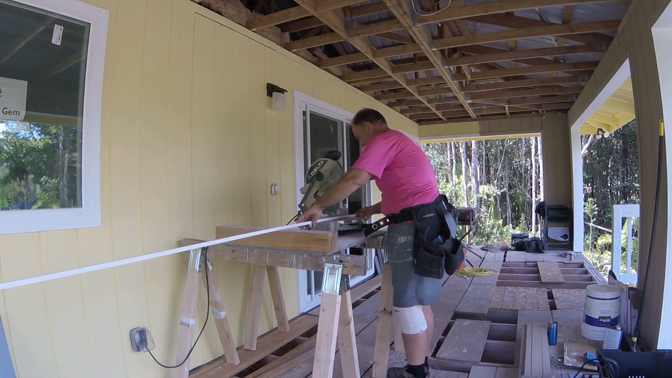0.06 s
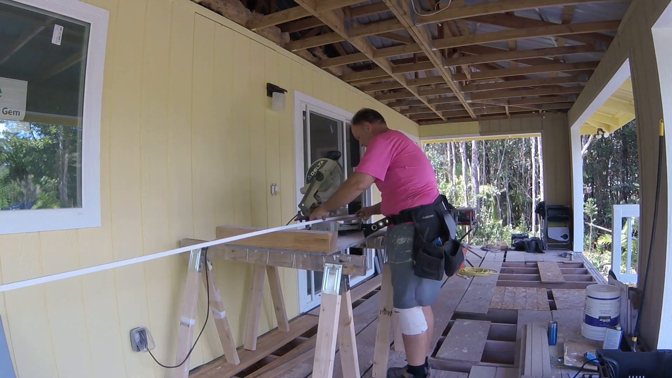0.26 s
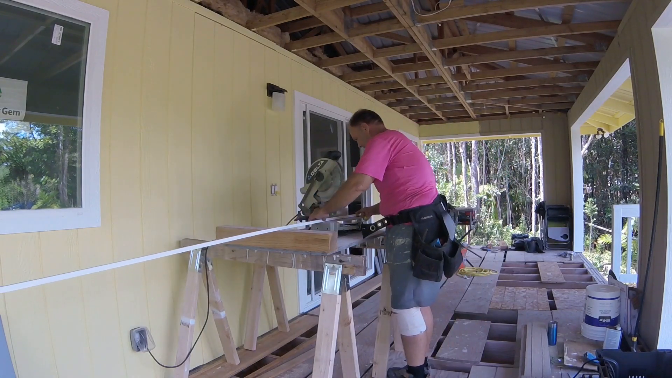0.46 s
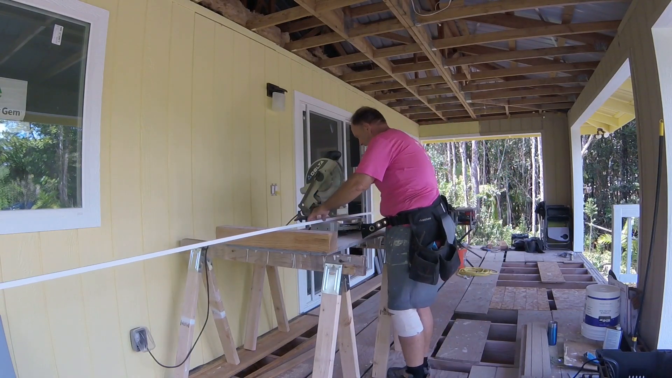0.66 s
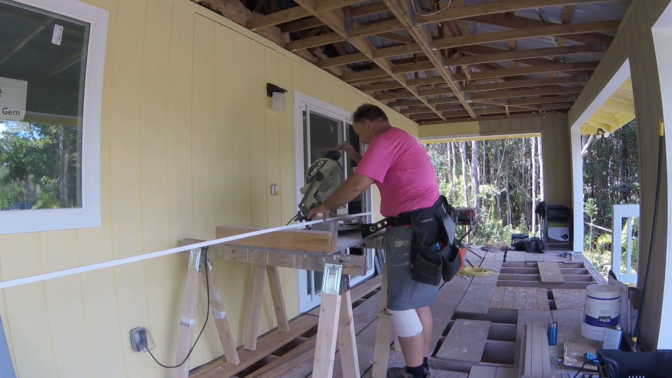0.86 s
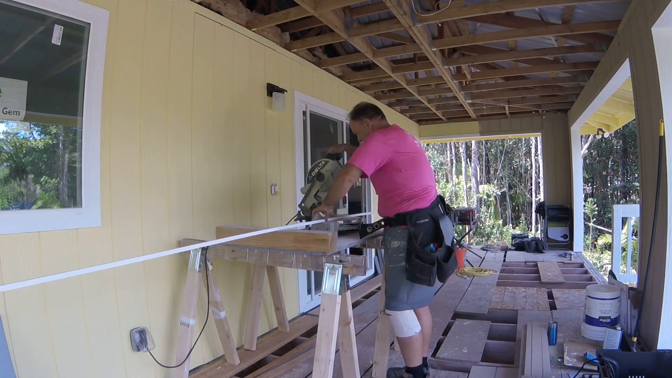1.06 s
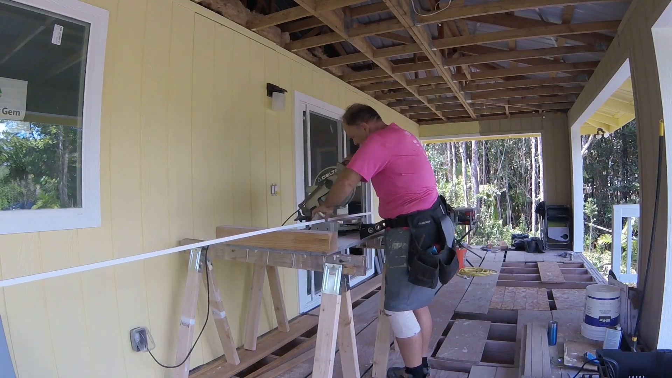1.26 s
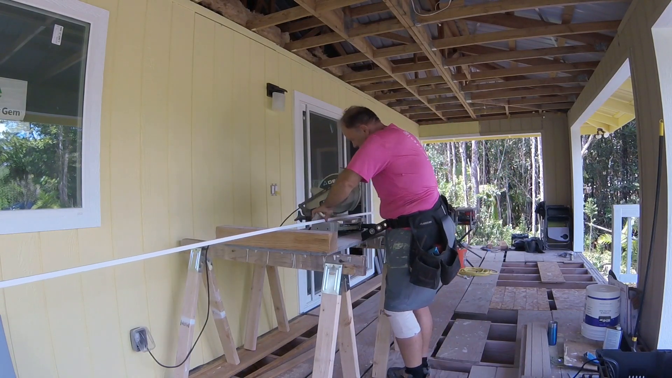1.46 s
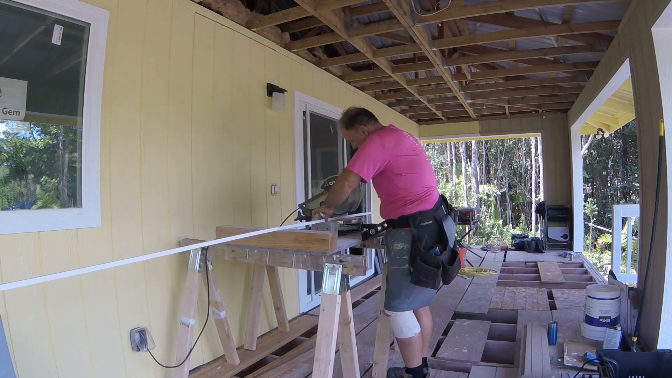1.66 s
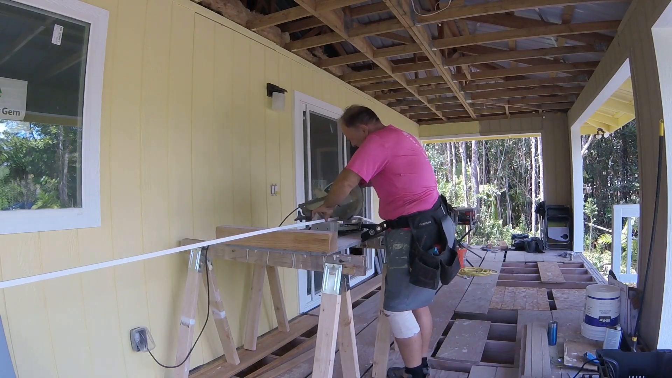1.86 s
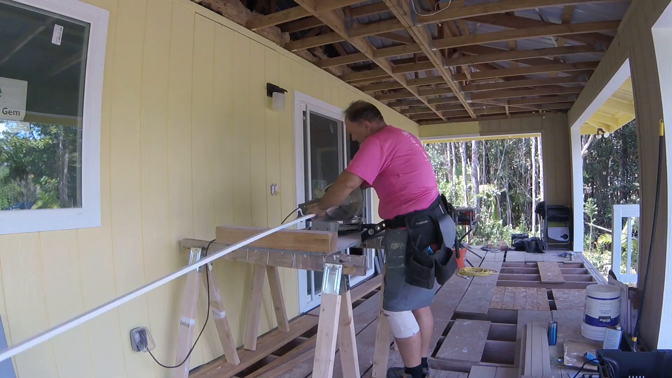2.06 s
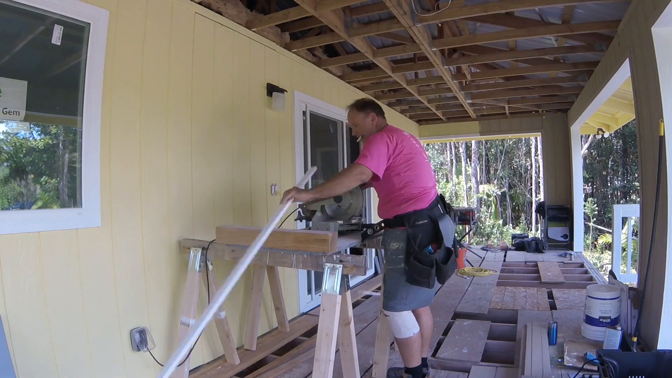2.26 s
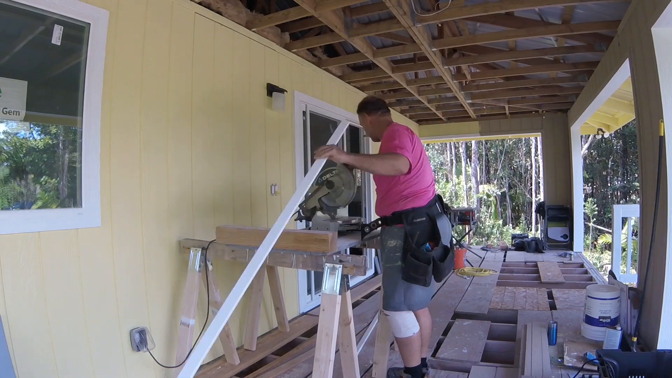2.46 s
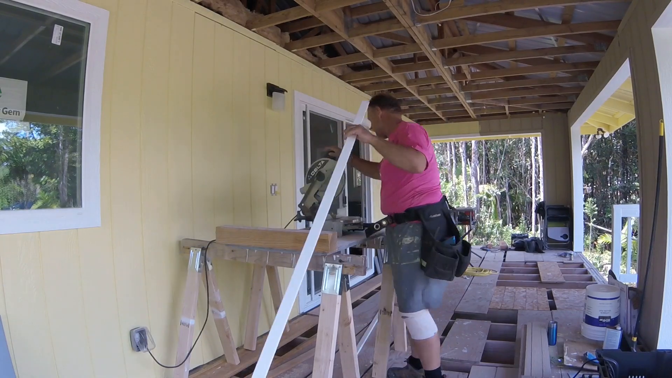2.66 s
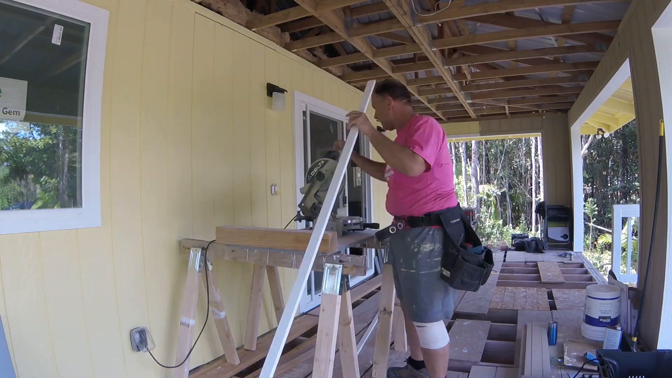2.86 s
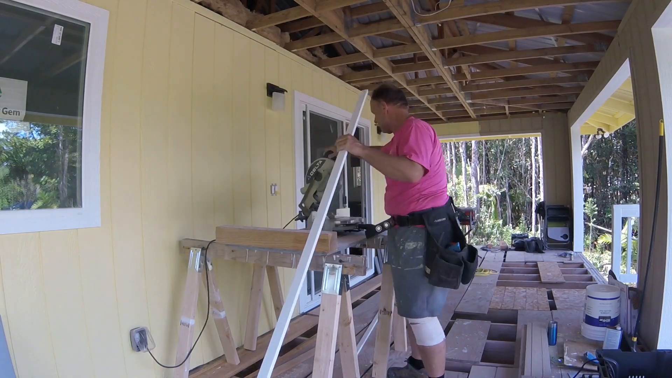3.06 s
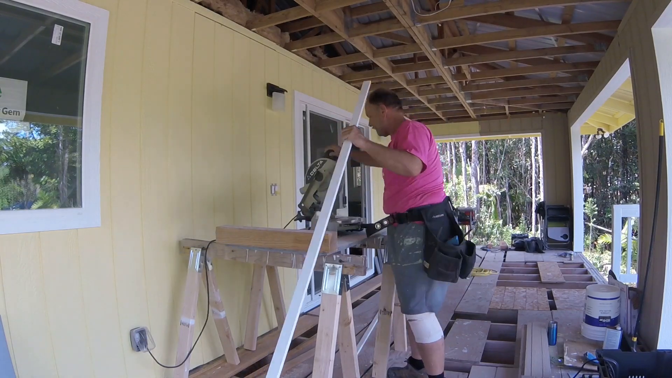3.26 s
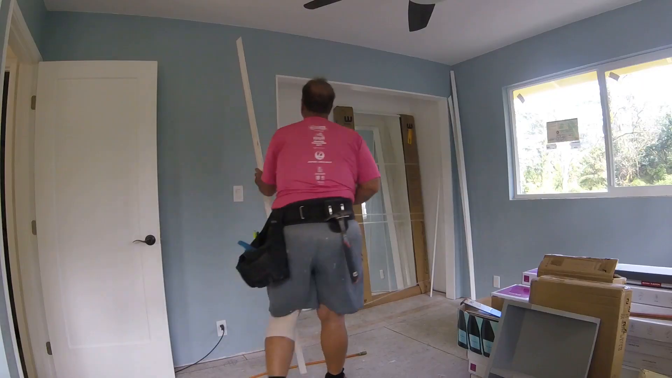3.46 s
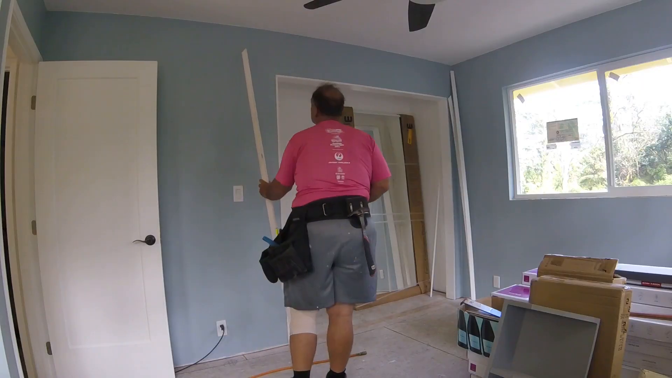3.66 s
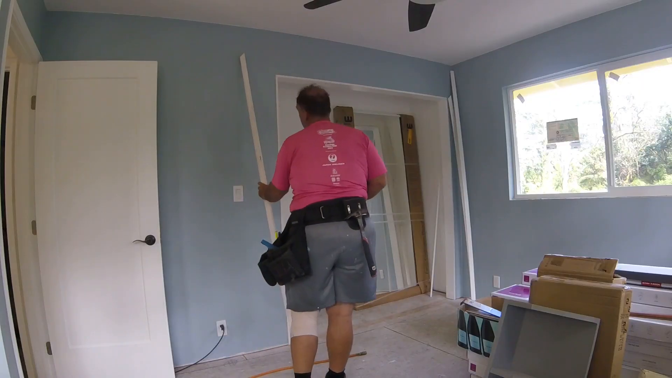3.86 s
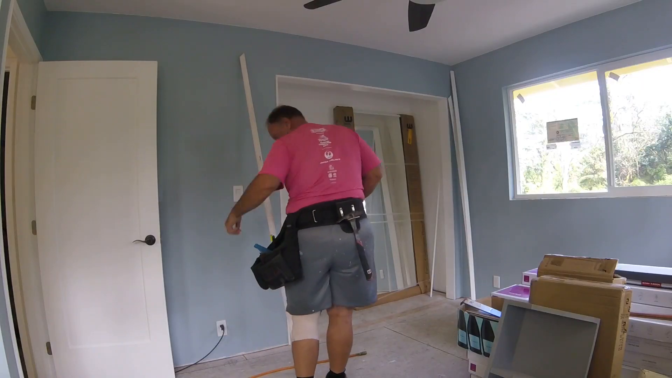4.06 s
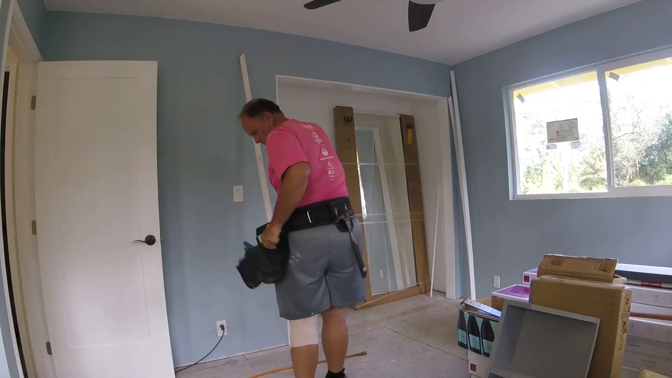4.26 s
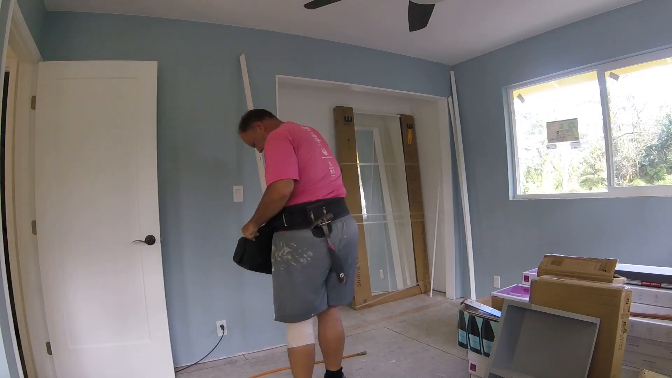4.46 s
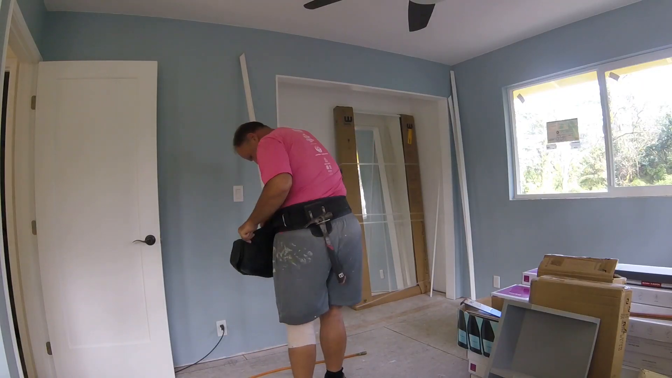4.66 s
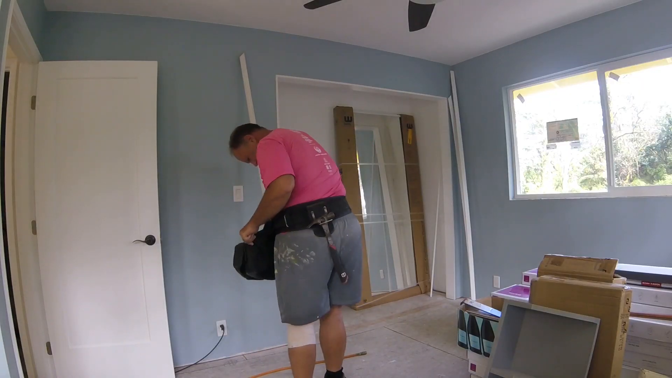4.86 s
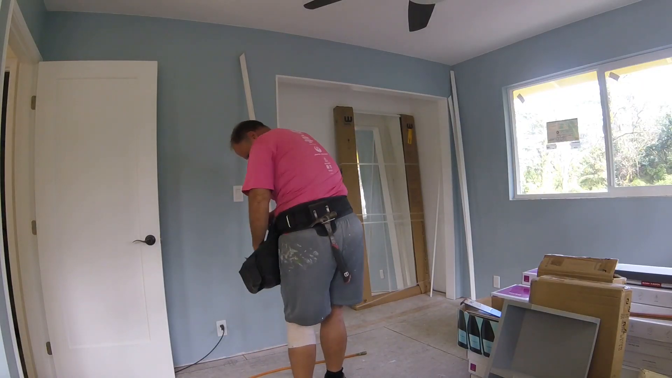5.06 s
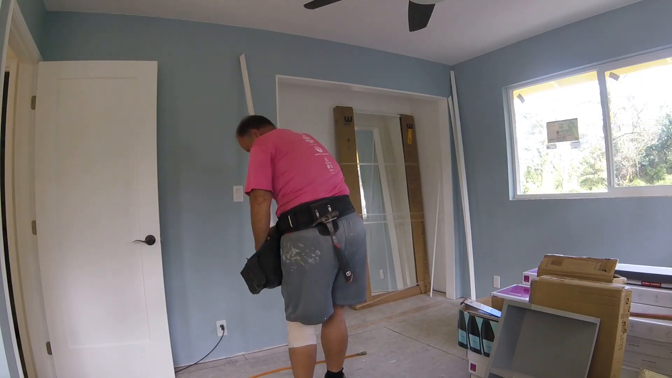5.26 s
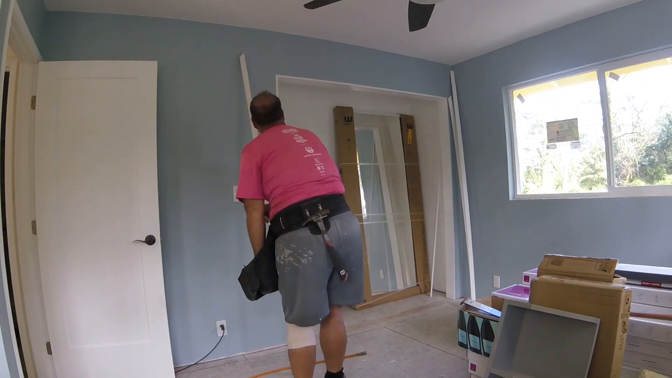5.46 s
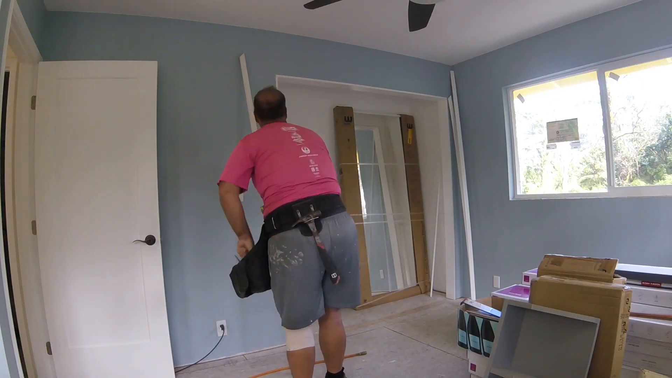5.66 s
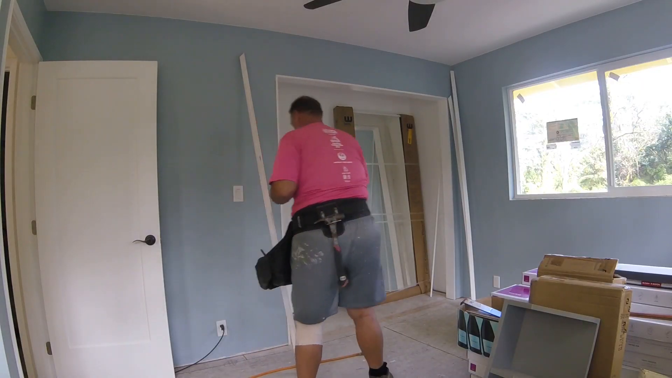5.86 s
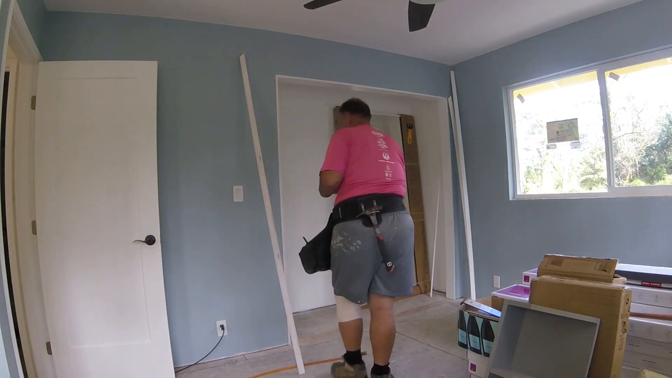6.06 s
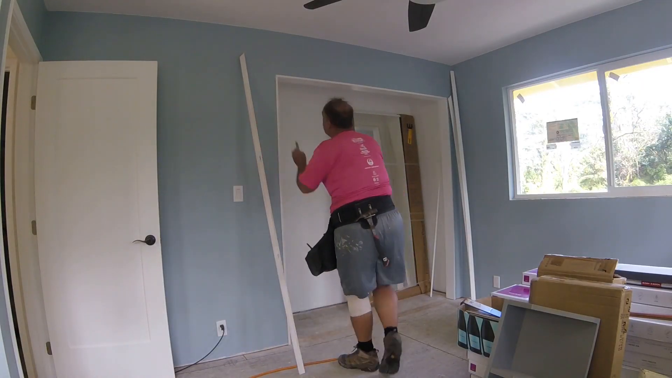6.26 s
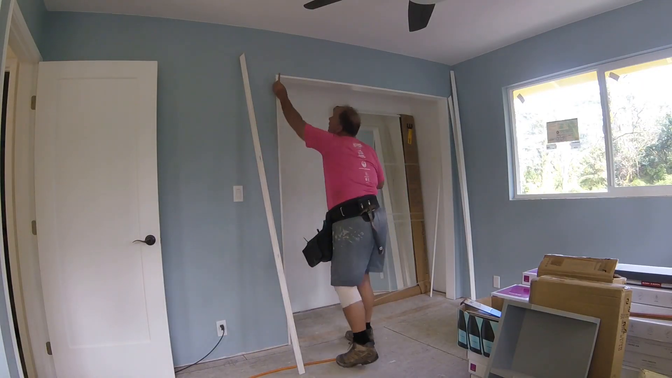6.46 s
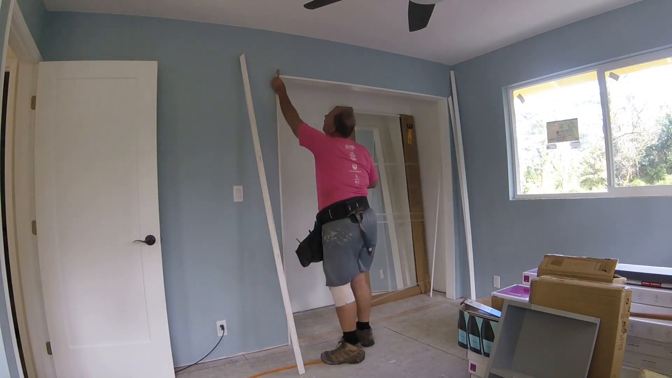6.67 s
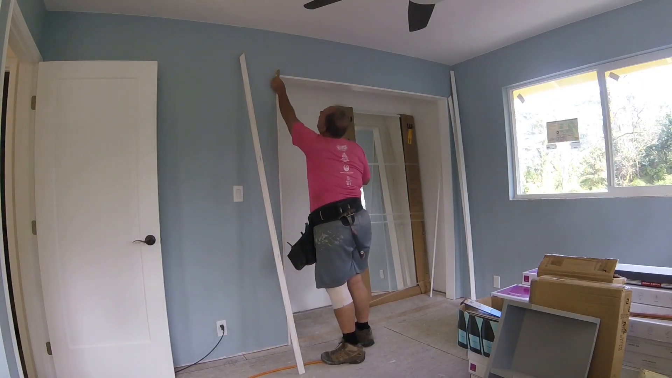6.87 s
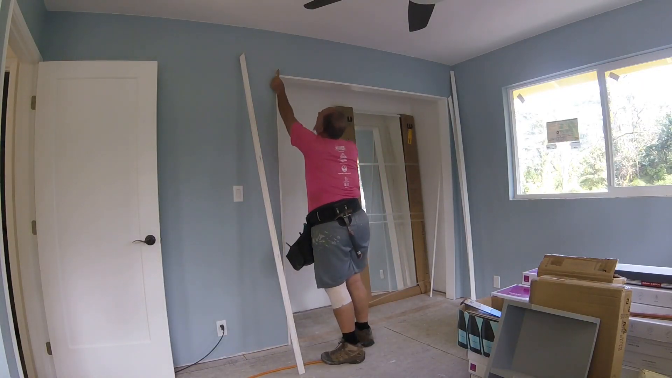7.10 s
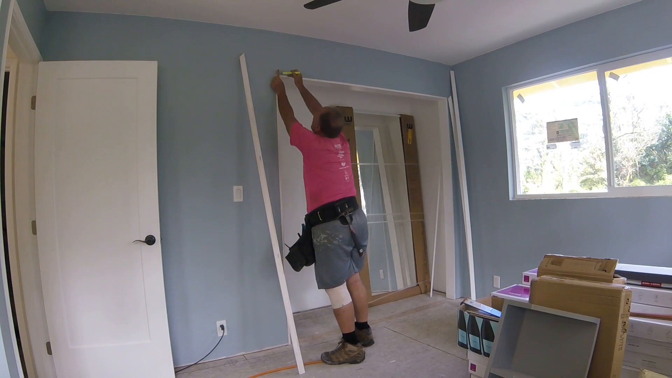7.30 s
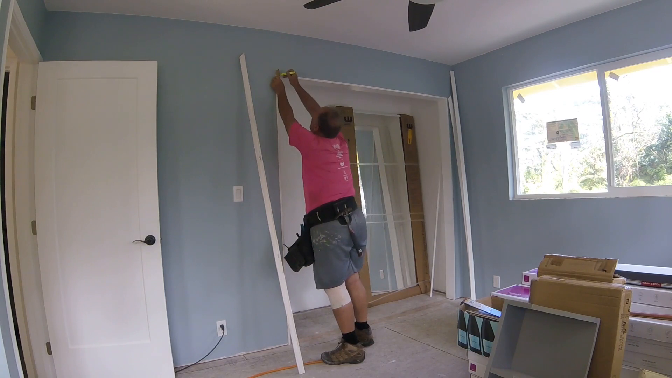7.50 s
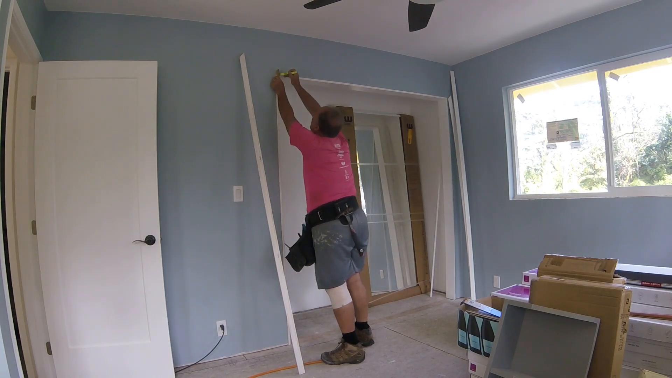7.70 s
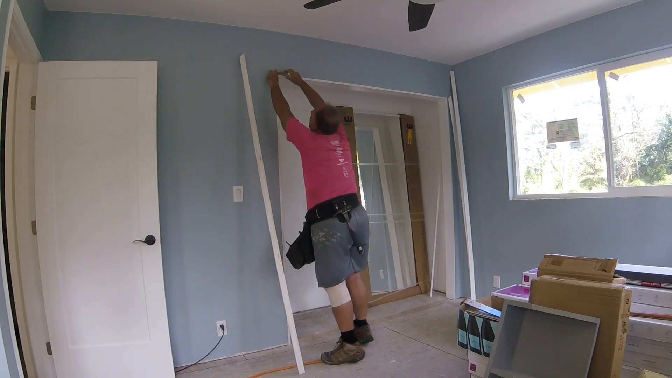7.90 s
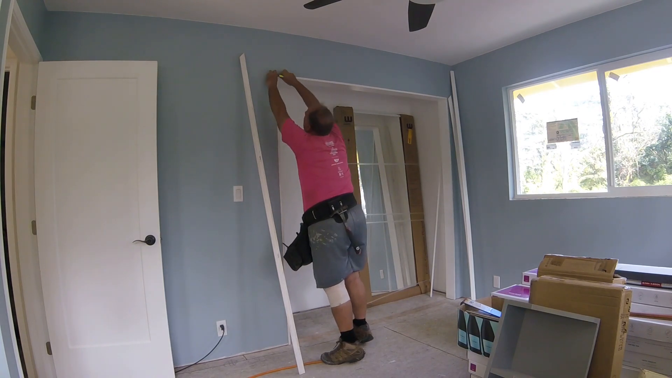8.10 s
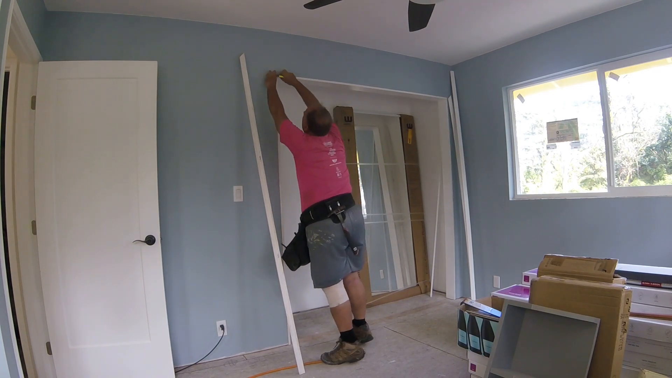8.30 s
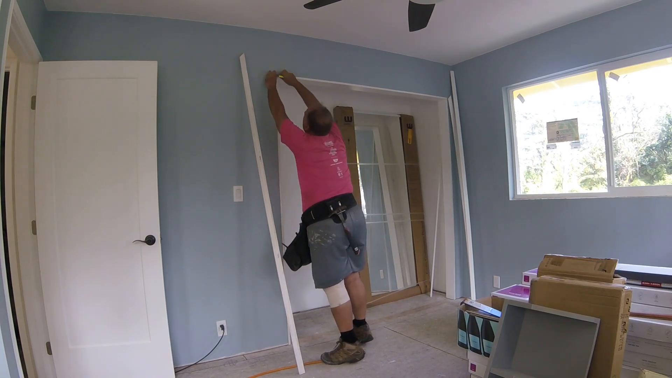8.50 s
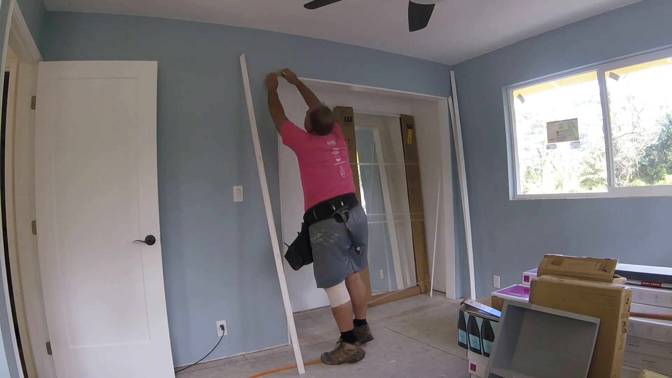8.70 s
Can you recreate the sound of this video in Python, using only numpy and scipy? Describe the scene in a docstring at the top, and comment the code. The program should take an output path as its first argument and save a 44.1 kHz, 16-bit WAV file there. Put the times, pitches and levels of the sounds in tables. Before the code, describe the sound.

A mitre saw cuts wooden trim and winds down with clattering knocks, then quiet indoor knocks, cloth rustles and shuffling footsteps follow.

```python
"""Mitre saw on an open porch: starts, bites through a strip of trim, coasts down; head and strip knock.
Fan roar, commutator whine and gear tones follow armature speed and ring the blade and housing.
The scene then jumps indoors: strip stood against a wall, hand in a tool pouch, shuffling shoes, faint hum.
Knocks are decaying modes; thuds, clacks and cloth are shaped noise."""
import sys
import numpy as np
from scipy import signal
from scipy.fft import rfft, irfft
from scipy.io import wavfile
from scipy.ndimage import uniform_filter1d

SR = 44100
rng = np.random.default_rng(int(sys.argv[2]) if len(sys.argv) > 2 else 0)


def materialize(psi):
    """Save the field psi as 16-bit PCM at rate SR to the path in sys.argv[1].

    A 1-D psi becomes a single channel; in a 2-D psi each row is a channel.
    """
    bounded = np.clip(np.atleast_2d(psi).T, -1, 1)
    quanta = np.round(bounded * 32767).astype(np.int16)
    wavfile.write(sys.argv[1], SR, quanta)


N = 385434

# Fan roar envelope (time [s], level [dB])
ROAR_LEVEL = [(1.228, -29.5), (1.32, -25.5), (1.41, -25), (1.56, -21.5), (1.75, -22.5), (1.93, -26.5),
              (2.33, -27.5), (2.42, -34), (3.399, -34.5)]
# Roar spectra, full speed and coasting (frequency [Hz], relative density [dB])
ROAR_FAST = [(35, -43), (60, -29.5), (353, -13.5), (762, -19), (919, -12), (1850, -1.5), (3390, -14.5),
             (8820, -3.5), (15800, -11.5)]
ROAR_SLOW = [(35, -47), (60, -16), (142, 1.5), (184, -22.5), (293, -7), (780, -10), (1850, 0), (2390, -10),
             (5280, -8), (15800, -11)]
# Commutator whines (multiple of speed, width [Hz], relative level [dB])
WHINE_ORDERS = [(36.3, 750, -2), (36.3, 230, -7), (72.4, 700, -4), (108.9, 500, -4), (56.2, 90, -11),
                (112.8, 250, -7), (96, 400, -7), (60, 300, -12)]
# Gear tones (multiple of speed, relative level [dB])
GEAR_ORDERS = [(1, -7), (2, -15), (4, -5), (8, 0)]
# Saw resonances (frequency [Hz], width [Hz], gain [dB])
HOUSING_MODES = [(141.58, 27, -1.5), (183.6, 8.7, -9.5), (290.57, 51, 0), (610.16, 140, -5.5),
                 (1008, 50, -11.5), (1806.4, 150, 2.5)]
BLADE_MODES = [(5235.2, 60, 1.5), (5492, 61, 2.5), (6067.6, 75, -4), (6366.3, 85, 2.5), (6833, 70, 6.5),
               (7513, 73, 0.5), (8011, 60, 1.5), (8213.4, 70, 1.5), (8927.3, 50, 3), (8977.6, 90, 6),
               (9236, 150, 1), (11279, 100, 3), (12558, 150, 0.5), (13493, 140, 4.5), (14378, 170, 6.5),
               (15145, 130, 4.5)]
GUARD_MODES = [(1834.3, 80, -12.5), (1964.7, 110, -12.5), (917.52, 70, -26.5)]
# Field coil buzz (frequency [Hz], level [dB], t60 [s])
INRUSH_TONES = [(361, -22.5, .4), (721, -35, .3)]
# Teeth biting (time [s], level [dB], half length [s])
TOOTH_BITES = [(1.808, -25, 0.12)]
# Saw stand, trim, loose saw parts, tool in pouch (frequency [Hz], relative level [dB], t60 [s])
STAND_MODES = [(370.24, -2.5, 0.1), (304.4, -3.5, 0.4), (629.89, -2.5, 0.10714), (540.63, -12, 0.1278)]
TRIM_MODES = [(352.94, -10.5, 0.2745), (493.2, 1.5, 0.02954), (632.4, 7, 0.02308), (751.03, 4.5, 0.03033),
              (899.37, -0.5, 0.02937), (1093, -12, 0.0609), (1389.7, -27, 0.1005)]
LOOSE_MODES = [(2000, -10, .07), (2490, 0, .07), (4090, 0, .05), (4780, -4, .05)]
TOOL_MODES = [(800, -6, .08), (2860, 0, .045), (3120, -1, .04), (8770, -6, .05)]
# Blows on those four (time [s], level [dB], tilt [dB/octave])
STAND_HITS = [(2.181, -29, 7), (2.257, -36, 13), (2.324, -34.5, -7.5), (2.373, -29.5, -3.5),
              (2.486, -35.5, -2), (2.548, -35, 0), (2.62, -34.5, -2), (2.644, -32, 8.5), (2.695, -37.5, 3),
              (3.235, -43.5, 3.5), (3.35, -44, -5.5)]
TRIM_HITS = [(0.043, -51, 6.5), (3.727, -26, -3), (3.905, -44, 12.5), (5.146, -49.5, 18.5)]
LOOSE_HITS = [(0.5477, -59, 2.5), (1.029, -53, -12), (1.04, -62, -6)]
TOOL_HITS = [(4.594, -51.5, 1.5)]
# Shoes and dull bumps (time [s], drive level [dB], tilt [dB/octave])
THUD_HITS = [(0.414, -44, -11.5), (0.58, -48, -4), (0.955, -42.5, -5.5), (1.049, -45.5, 0.5),
             (2.321, -16, 2), (3.411, -34.5, 0.5), (3.455, -35.5, -5), (3.575, -37.5, -3),
             (3.724, -29, 1.5), (3.904, -41.5, 0.5), (5.725, -45.5, 5.5), (5.879, -41, -2),
             (5.912, -38, -4), (6.203, -44, 1.5), (6.239, -41.5, -5.5), (6.329, -41, -3), (6.44, -40, -4),
             (6.464, -40, -3.5), (6.598, -40.5, -2), (6.628, -39, 2.5), (6.933, -59, 0.5),
             (7.023, -56.5, 1.5)]
# Floor boom (frequency [Hz], width [Hz], gain [dB])
FLOOR_MODES = [(245, 140, -2)]
# Clacks and scuffs (time [s], level [dB], tilt [dB/octave], t60 [s])
CLACK_HITS = [(0.036, -50, -9, 0.1105), (0.101, -55.5, -2, 0.1057), (0.549, -51, -2, 0.1089),
              (0.678, -54, -4, 0.1267), (0.945, -56.5, -3, 0.2216), (1.03, -46.5, -1, 0.1296),
              (1.2281, -21.5, -4.5, 0.3368), (2.175, -21, -4.5, 0.2097), (2.186, -13.5, -0.5, 0.07942),
              (2.3237, -23, -5, 0.12385), (2.3684, -13, 1.5, 0.05693), (3.4545, -38, -6, 0.17287),
              (3.5737, -51.5, -4, 0.282), (3.728, -46, -11.5, .15), (4.278, -57, -4.5, 0.538),
              (4.519, -49, -1, 0.0733), (4.594, -44.5, -1.5, 0.1732), (4.691, -53, -4, 0.361),
              (4.866, -55.5, -3, 0.1547), (4.977, -56.5, -4, 0.2615), (5.139, -56.5, -6, 0.19),
              (5.678, -39.5, 10, 0.1843), (5.913, -50, -12.5, 0.1856), (5.983, -40, 3, 0.1391),
              (6.105, -57.5, -7, 0.26), (6.328, -54, 1, 0.1961), (6.443, -48.5, -5.5, 0.21),
              (6.485, -57, -1, 0.4453), (6.596, -58, -6.5, 0.35), (6.636, -48.5, -10, 0.1543),
              (6.787, -58.5, -6, .12), (7.689, -59, -3, 0.17), (7.899, -58.5, -9.5, .2),
              (8.368, -58.5, -2, 0.1)]
# Strokes on the pouch (peak time [s], level [dB], swell [s], fade [s], relative rub [dB])
POUCH_STROKES = [(4.41, -48.5, 0.07624, 0.06415, -34.5), (4.55, -57.5, 0.02667, 0.09984, -10),
                 (4.74, -54.5, 0.02344, 0.0513, 0), (5.31, -63, 0.033, 0.1265, -5.5),
                 (5.717, -46.5, 0.03529, 0.03845, -3.5)]
# Cloth hiss (frequency [Hz], relative density [dB])
CLOTH_SPECTRUM = [(410, -4), (700, -12.5), (1340, -4), (2210, 0), (7230, -5.5), (15800, -9.5)]
# Thin squeaks (time [s], level [dB], start [Hz], end [Hz], length [s])
SQUEAKS = [(0.229, -65.5, 10800, 10100, 0.02786), (0.273, -63, 10200, 8259, 0.0188)]
# Breeze envelope (time [s], level [dB])
BREEZE_LEVEL = [(0, -50), (.37, -60.5), (.45, -45.5), (1.2, -61), (3.4, -52.5)]
# Ambient air (frequency [Hz], relative density [dB])
AIR_SPECTRUM = [(12, -40), (20, -26), (101, -2), (158, -13), (261, -6.5), (326, -5), (419, -13.5),
                (1650, -23), (7650, -29.5), (15800, -39)]
# Distant machinery (frequency [Hz], waver [Hz], level [dB])
HUM_TONES = [(109.43, 2.3, -65.5), (331.75, 7.0304, -57.5), (302.2, 5.1, -72.5)]
# Echo decay (frequency [Hz], t60 [s])
ECHO_DECAY = [(100, 0.28), (1000, 0.077), (5000, 0.16), (15000, 0.11)]

TRIGGER_S, RELEASE_S, INDOORS_S = 1.227, 1.755, 3.398
WHINE_STEP_S, EMERGED_S = 1.72, 1.36  # whine steps slightly louder; whine and gears fully faded in


def saw():
    """Motor sounds follow armature speed; tones light up each blade or housing resonance they cross."""
    t = np.arange(TRIGGER_S, INDOORS_S, 1 / SR)
    coast_s = np.maximum(t - RELEASE_S, 0)
    speed_hz = armature_hz(np.minimum(t, RELEASE_S) - TRIGGER_S, coast_s)
    turns = np.cumsum(speed_hz) / SR
    emerged = np.minimum((t - TRIGGER_S) / (EMERGED_S - TRIGGER_S), 1)
    level = gain_of(np.interp(t, *np.transpose(ROAR_LEVEL)))
    roar = level * fan_roar(speed_hz, turns)
    whine = level * emerged * commutator_whine(t, speed_hz, turns)
    motor = coil_buzz(t) + roar + 0.5 * whine + gears(turns, coast_s, emerged)
    out = np.zeros(N)
    add(out, TRIGGER_S, motor + blade(t, whine, level))
    return out


def armature_hz(driven_s, coast_s):
    """Fast run-up plus slow creep under power; drag and friction slow it after release."""
    run_up_hz, half_rise_s, creep_hz_per_s = 230, 0.066, 76
    drag_tau_s, friction_hz = 3.59, 100.3
    driven_hz = run_up_hz * driven_s / (driven_s + half_rise_s) + creep_hz_per_s * driven_s
    return (driven_hz + friction_hz) * np.exp(-coast_s / drag_tau_s) - friction_hz


def fan_roar(speed_hz, turns):
    """Air noise, brighter with speed; the blade guard rings with it."""
    size = len(turns)
    bright = np.clip((speed_hz - 140) / 90, 0, 1)
    roar = np.sqrt(bright) * noise(ROAR_FAST, size, 1.8) + np.sqrt(1 - bright) * noise(ROAR_SLOW, size, 2)
    roar *= 1 + 0.057 * np.cos(2 * np.pi * turns)  # fan imbalance
    hiss = rng.standard_normal(size)
    return roar + sum(gain_of(db) * band(hiss, hz, width) for hz, width, db in GUARD_MODES)


def commutator_whine(t, speed_hz, turns):
    """Noise bands at multiples of speed, each fading in and out; louder as the motor strains."""
    hiss = rng.standard_normal(len(t))
    whine = np.zeros(len(t))
    for order, width_hz, db in WHINE_ORDERS:
        hz = order * speed_hz
        whine += gain_of(db + 2 * drift(len(t), 2500, 1500)) * band(hiss, hz, width_hz) * (hz < 17000)
    whine_step_db = np.where(t < WHINE_STEP_S, -9.5, -7)
    strain_db = 6 * bell(t, at_s=1.42, half_s=0.1)
    brush_pressure = 1 + 0.7 * np.cos(2 * np.pi * turns)
    return gain_of(whine_step_db + strain_db) * brush_pressure * whine


def blade(t, whine, roar_gain):
    """Blade modes ring with the whine and a rasping hiss; the top three sing out as the teeth bite."""
    hiss = rng.standard_normal(len(t))
    rasp = roar_gain * gain_of(-9.5) * unit_rms(gain_of(3 * drift(len(t), 150)) * hiss)
    bite = sum(gain_of(db) * bell(t, at_s, half_s) for at_s, db, half_s in TOOTH_BITES)
    treble = unit_rms(through(hiss, BLADE_MODES[-3:], leak=0.055))
    return through(whine + rasp, BLADE_MODES, leak=0) + bite * treble


def gears(turns, coast_s, emerged):
    """Clean tones through the housing, quieter once unloaded."""
    driven_db, idle_db, unload_s = -30, -34, 0.065
    level_db = idle_db + (driven_db - idle_db) * np.exp(-coast_s / unload_s)
    tones = emerged ** 2 * sum(gain_of(db) * np.sin(2 * np.pi * k * turns) for k, db in GEAR_ORDERS)
    return gain_of(level_db) * through(through(tones, HOUSING_MODES, leak=0.024), HOUSING_MODES, leak=0.18)


def coil_buzz(t):
    """Starting current makes the field coils buzz and throb; a low tone swells during run-up."""
    throb_hz, shudder_hz, hold_s, rise_s = 31, 180, 0.05, 0.011
    age_s = t - TRIGGER_S
    buzz = sum(gain_of(db - 60 * np.maximum(age_s - hold_s, 0) / t60_s) * np.sin(2 * np.pi * hz * age_s)
               for hz, db, t60_s in INRUSH_TONES)
    buzz *= 1 - 0.22 * np.cos(2 * np.pi * throb_hz * age_s)
    shudder = gain_of(-33) * bell(t, at_s=1.46, half_s=0.07) * np.sin(2 * np.pi * shudder_hz * age_s)
    return (buzz + shudder) * np.minimum(age_s / rise_s, 1)


def blows(hits, modes, chatter_t60_s):
    """Each blow rings the same modes in its own proportions; the contact chatters briefly."""
    out, t = np.zeros(N), np.arange(SR // 3) / SR
    rise_s = 0.00097
    for at_s, db, tilt_db in hits:
        scatter_db = 1.5 * rng.standard_normal(len(modes))
        hiss, fade = burst(chatter_t60_s, rise_s=0.00066)
        chatter = (hiss * fade)[:SR // 10]
        ring = np.zeros(len(t))
        for (hz, mode_db, t60_s), offset_db in zip(modes, scatter_db):
            level_db = mode_db + offset_db + tilt_db * np.log2(hz / 500) - 60 * t / t60_s
            chatter_gain = np.std(resonate(chatter, hz, 2.2 / t60_s) * t60_s)
            ring += gain_of(level_db) * np.sin(2 * np.pi * hz * t) / chatter_gain
        ring = signal.fftconvolve(ring * np.minimum(t / rise_s, 1), chatter)[:len(t)]
        add(out, at_s, gain_of(db) * ring / np.std(ring[:1500]))
    return out


def thuds():
    """Soft soles and wood push low noise into the floor."""
    out = np.zeros(N)
    for at_s, db, tilt_db in THUD_HITS:
        hiss, fade = burst(t60_s=0.19267, rise_s=0.003279)
        low = tinted(hiss, lambda hz: gain_of(tilt_db * np.log2(hz / 200))
                     / (1 + (hz / 900) ** 3) / (1 + (60 / hz) ** 3))
        add(out, at_s, gain_of(db) * fade * unit_rms(low))
    return through(out, FLOOR_MODES, leak=0.79)


def clacks():
    """Hard contacts: sharp front, broad dying band."""
    out = np.zeros(N)
    for at_s, db, tilt_db, t60_s in CLACK_HITS:
        hiss, fade = burst(t60_s, rise_s=0.0008)
        bright = tinted(hiss, lambda hz: gain_of(tilt_db * np.log2(hz / 4000))
                        / (1 + (900 / hz) ** 3) / (1 + (hz / 12962) ** 2))
        add(out, at_s, gain_of(db) * fade * unit_rms(bright))
    return out


def pouch():
    """Stiff cloth: hiss roughened by tiny slips, plus a lower rub, swelling with each stroke."""
    t = np.arange(N) / SR
    slips = gain_of(1.5 * drift(N, 90))
    hiss = unit_rms(slips * noise(CLOTH_SPECTRUM, N, patchy_db=0.813))
    rub = band(hiss, hz=1176, width_hz=1275)
    return sum(gain_of(db) * bell(t, at_s, np.where(t < at_s, swell_s, fade_s))
               * (hiss + gain_of(rub_db) * rub) for at_s, db, swell_s, fade_s, rub_db in POUCH_STROKES)


def squeaks():
    """Short, falling, narrow noise bands."""
    out = np.zeros(N)
    for at_s, db, start_hz, end_hz, length_s in SQUEAKS:
        hz = np.linspace(start_hz, end_hz, round(length_s * SR))
        squeak = band(rng.standard_normal(len(hz)), hz, width_hz=400)
        add(out, at_s, gain_of(db) * squeak * signal.windows.tukey(len(hz), 0.4))
    return out


def background():
    """Ambient air, wavering machinery hum, and lumpy breeze while outdoors."""
    t = np.arange(N) / SR
    air = noise(AIR_SPECTRUM, N, patchy_db=1.3)
    air *= gain_of(-63.5) / np.std(tinted(air, lambda hz: hz > 400))  # level above 400 Hz
    hum = np.zeros(N)
    for hz, waver_hz, db in HUM_TONES:
        level = gain_of(db + 1.2 * drift(N, 1200, 1200))
        hum += level * np.sin(2 * np.pi * np.cumsum(hz + waver_hz * drift(N, 1200, 1200)) / SR)
    lumps = gain_of(3.2 * drift(N, 1500))
    rumble = tinted(rng.standard_normal(N), lambda hz: 1 / (1 + (hz / 150) ** 3) / (1 + (40 / hz) ** 1.5))
    breeze = gain_of(np.interp(t, *np.transpose(BREEZE_LEVEL))) * unit_rms(lumps * rumble)
    return air + hum + breeze * (t < INDOORS_S)


def walls(x, wet_db):
    """Adds sparse echoes of random sign, each band dying at its own rate."""
    taps = np.zeros(SR // 2)
    slots = np.arange(200, len(taps) - 20, 20)
    taps[slots + rng.integers(0, 20, len(slots))] = rng.choice([-1., 1.], len(slots))
    hz, t, spectra = signal.stft(taps, SR, nperseg=256)
    tail = signal.istft(spectra * gain_of(-60 * t / curve_at(ECHO_DECAY, hz)[:, None]), SR, nperseg=256)[1]
    return x + gain_of(wet_db) * signal.fftconvolve(x, tail / np.linalg.norm(tail))[:N]


def gain_of(db):
    return 10 ** (np.asarray(db) / 20)


def unit_rms(x):
    return x / np.sqrt(np.mean(x ** 2) + 1e-20)


def bell(t, at_s, half_s):
    return np.exp(-((t - at_s) / half_s) ** 2)


def curve_at(points, hz):
    point_hz, value = np.transpose(points)
    return np.interp(np.log(hz + 1), np.log(point_hz + 1), value)


def add(mix, at_s, sound):
    part = mix[round(at_s * SR):][:len(sound)]
    part += sound[:len(part)]


def drift(size, *spans_samples):
    """Smoothed noise, unit RMS."""
    x = rng.standard_normal(size)
    for span in spans_samples:
        x = uniform_filter1d(x, span)
    return unit_rms(x)


def burst(t60_s, rise_s):
    """White noise and a rise-and-decay envelope for it."""
    t = np.arange(SR // 3) / SR
    return rng.standard_normal(len(t)), (1 - np.exp(-t / rise_s)) * gain_of(-60 * t / t60_s)


def noise(spectrum, size, patchy_db):
    """Coloured noise with drifting spectral patches, unit RMS."""
    real, imag, patches = rng.standard_normal((size // 256 + 5, 513, 3)).T
    patches = unit_rms(uniform_filter1d(uniform_filter1d(patches, 10, 0), 8, 1))
    level_db = curve_at(spectrum, np.fft.rfftfreq(1024, 1 / SR))[:, None] + patchy_db * patches
    spectra = (real + 1j * imag) * gain_of(level_db)
    return unit_rms(signal.istft(spectra, nperseg=1024, noverlap=768)[1][:size])


def tinted(x, gain_at_hz):
    """Filters x by a gain curve."""
    return irfft(rfft(x) * gain_at_hz(np.fft.rfftfreq(len(x), 1 / SR) + 1), len(x))


def resonate(x, hz, width_hz):
    """Unity-gain resonance, free to glide: shift to 0 Hz, smooth, shift back."""
    carrier = np.exp(2j * np.pi * np.cumsum(hz * np.ones(len(x))) / SR)
    pole = np.exp(-np.pi * width_hz / SR)
    return 2 * (carrier * signal.lfilter([1 - pole], [1, -pole], x / carrier)).real


def band(x, hz, width_hz):
    """Two resonances in series, unit RMS."""
    return unit_rms(resonate(resonate(x, hz, width_hz), hz, width_hz))


def through(x, modes, leak):
    """Parallel resonances plus a direct leak."""
    return leak * x + sum(gain_of(db) * resonate(x, hz, width_hz) for hz, width_hz, db in modes)


def scene():
    """Porch, then room; porch sounds stop dead at the jump."""
    t = np.arange(N) / SR
    sources = (saw() + blows(STAND_HITS, STAND_MODES, 0.07005) + blows(TRIM_HITS, TRIM_MODES, 0.09432)
               + blows(LOOSE_HITS, LOOSE_MODES, 0.081) + blows(TOOL_HITS, TOOL_MODES, 0.02814)
               + thuds() + clacks() + pouch() + squeaks())
    outside = t < INDOORS_S
    porch = walls(sources * outside, wet_db=-9.5) * outside
    room = walls(sources * ~outside, wet_db=-8.0)
    dip_db = -11.5 * np.exp(-((t - 2.36) / 0.007436) ** 4)  # level dips briefly
    return ((porch + room) * gain_of(dip_db) + background())[None]


def record(dry):
    """Low-pass band limit."""
    cutoff_hz = 15850
    return signal.oaconvolve(dry, signal.firwin(511, cutoff_hz, window=("kaiser", 9), fs=SR)[None], "same")


dry = scene()
out = record(dry)
materialize(out)
```